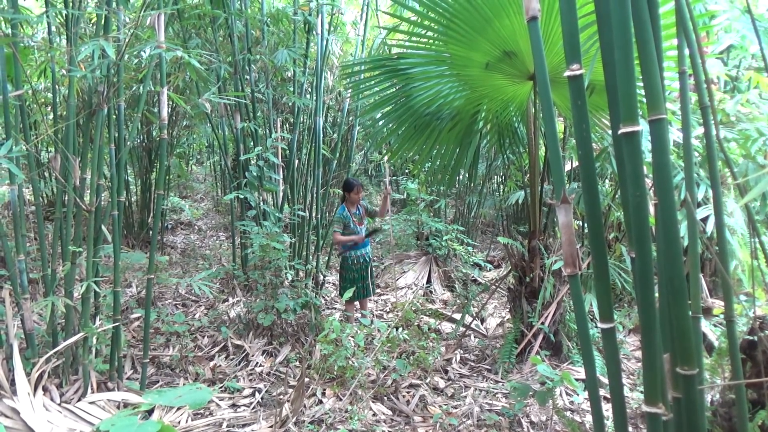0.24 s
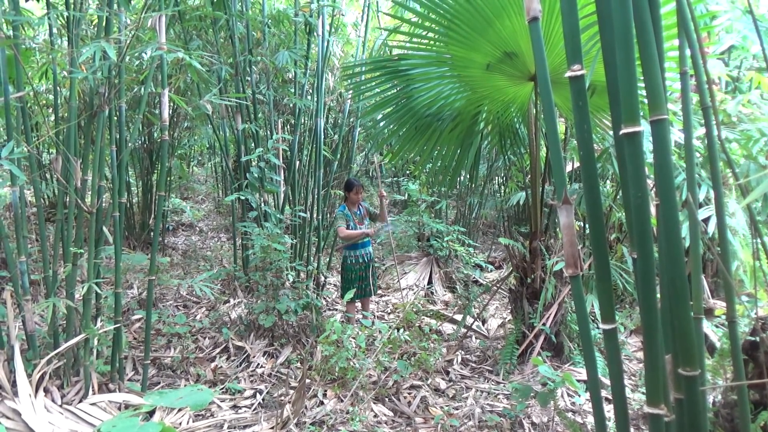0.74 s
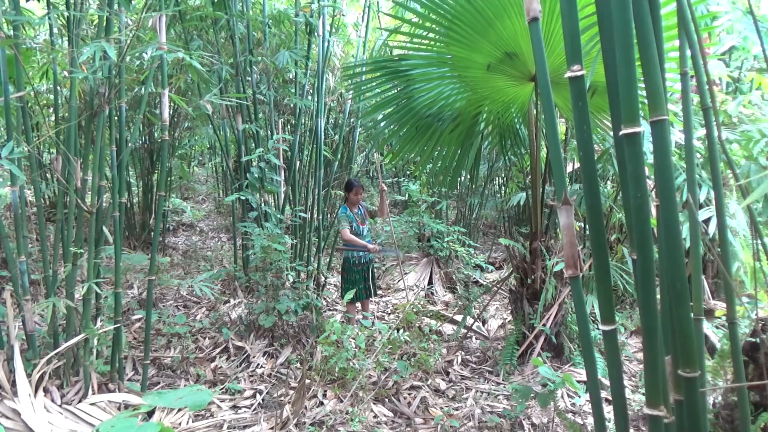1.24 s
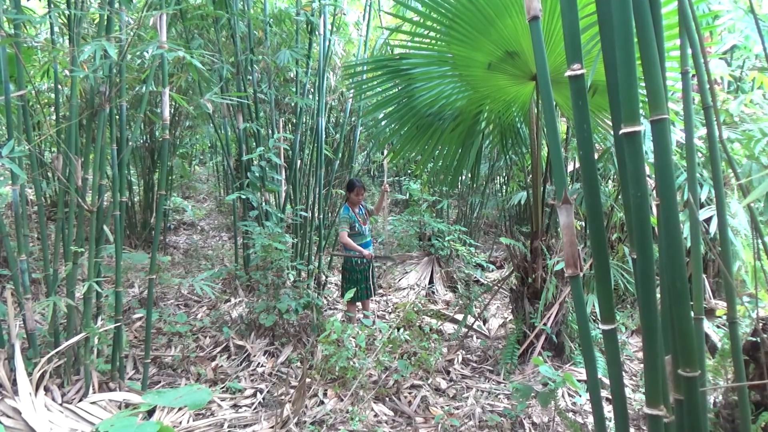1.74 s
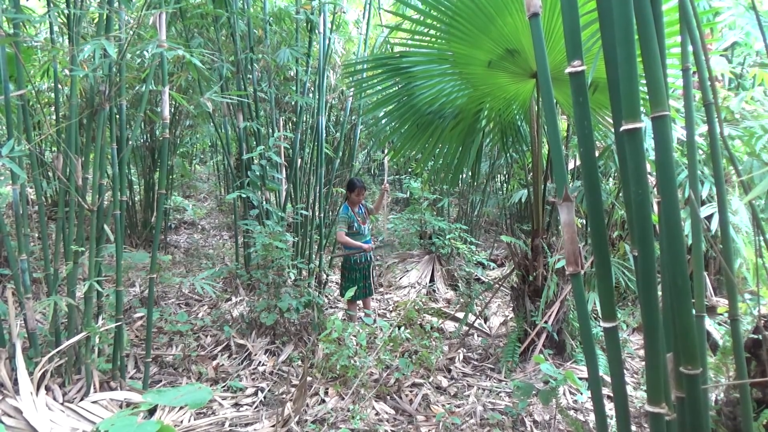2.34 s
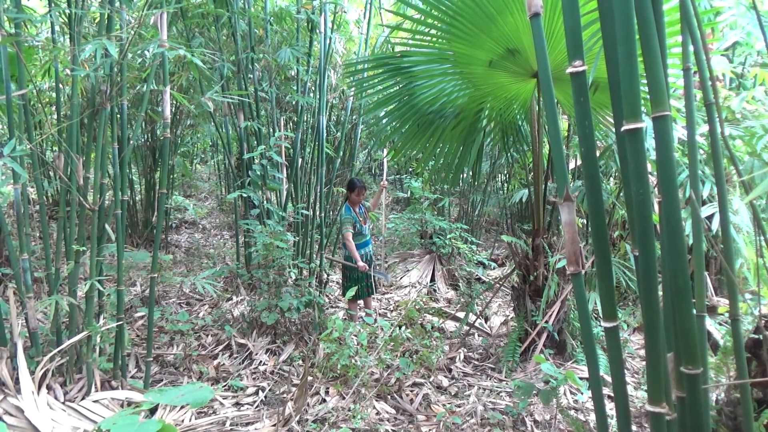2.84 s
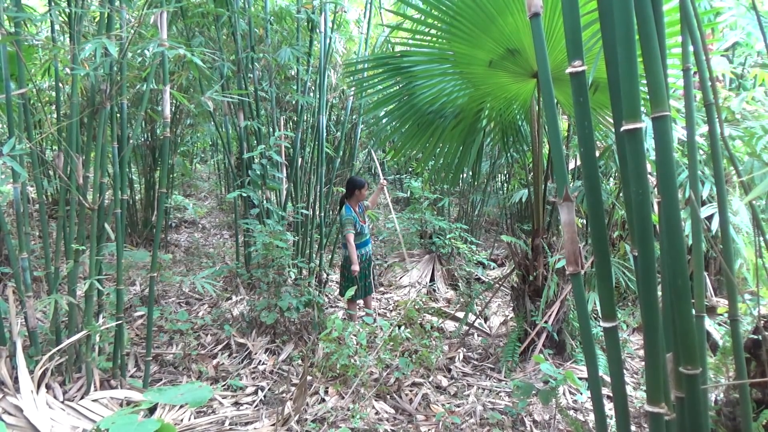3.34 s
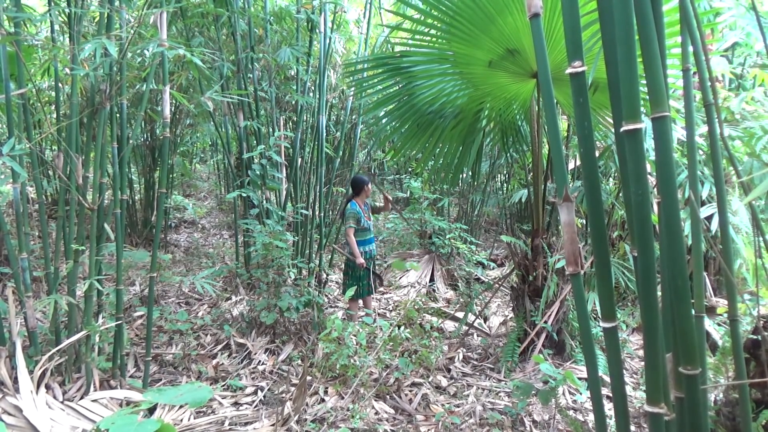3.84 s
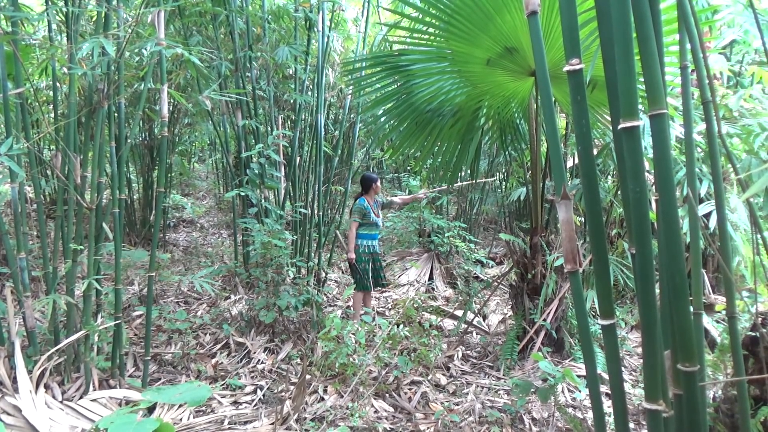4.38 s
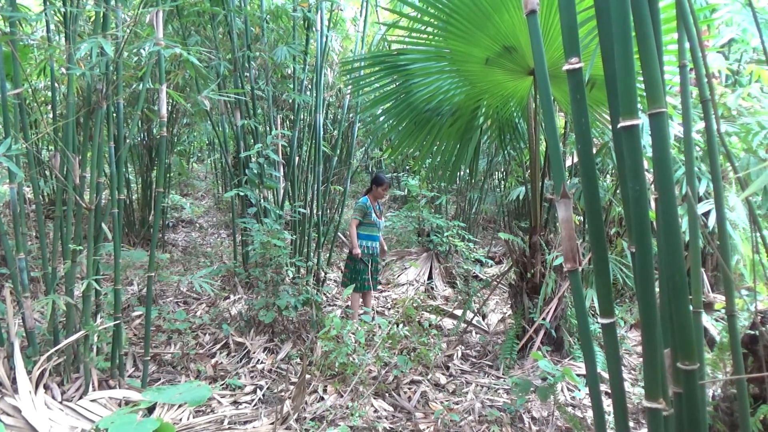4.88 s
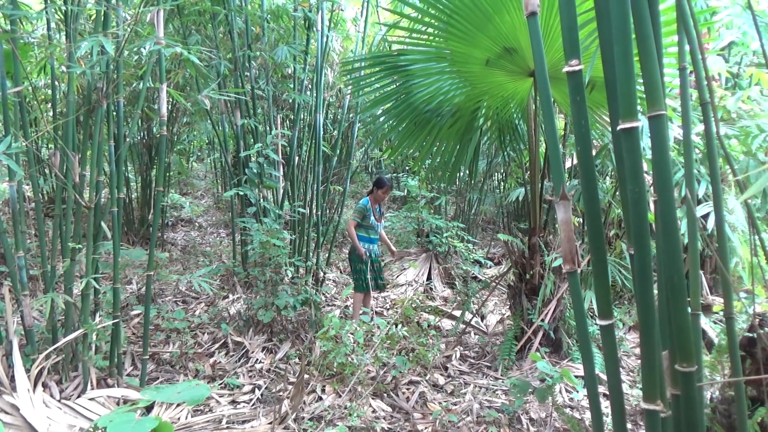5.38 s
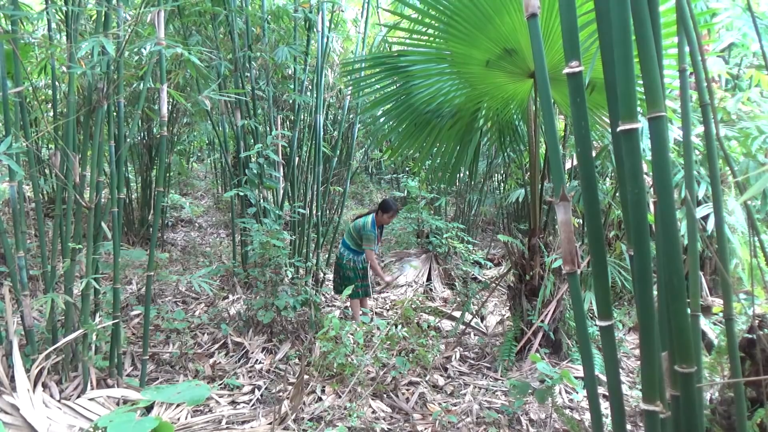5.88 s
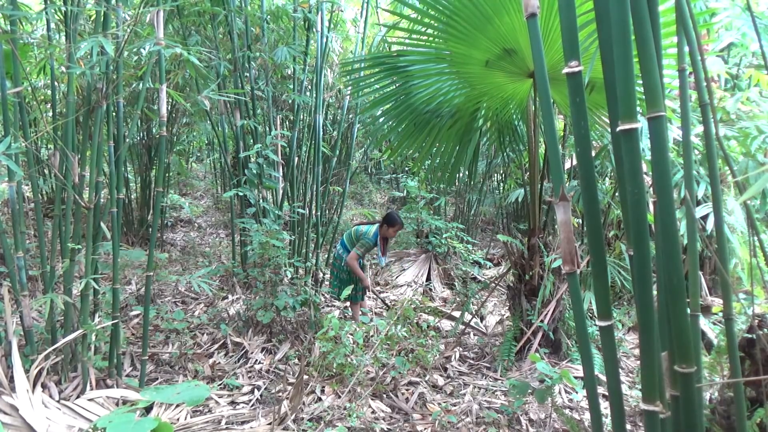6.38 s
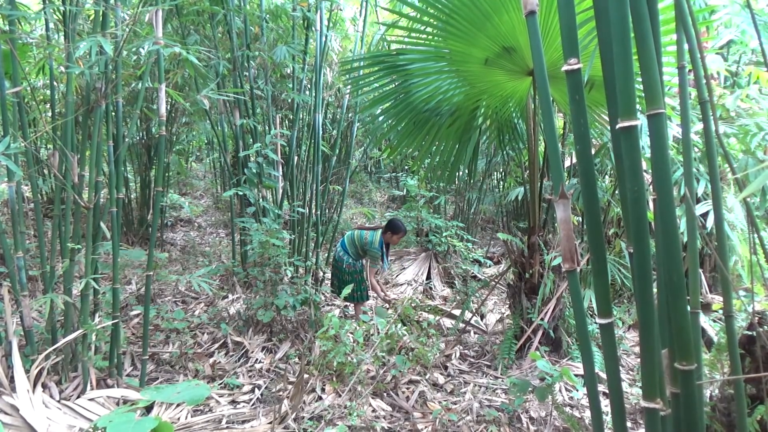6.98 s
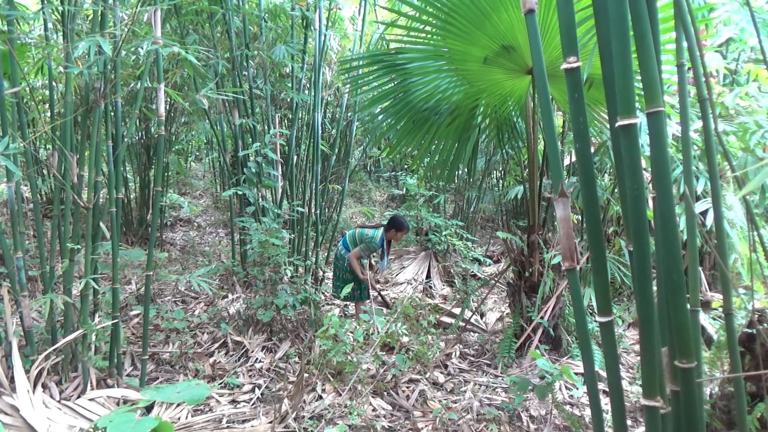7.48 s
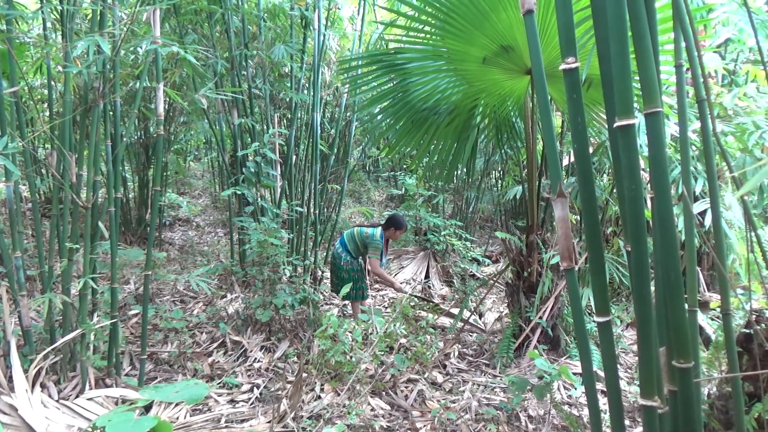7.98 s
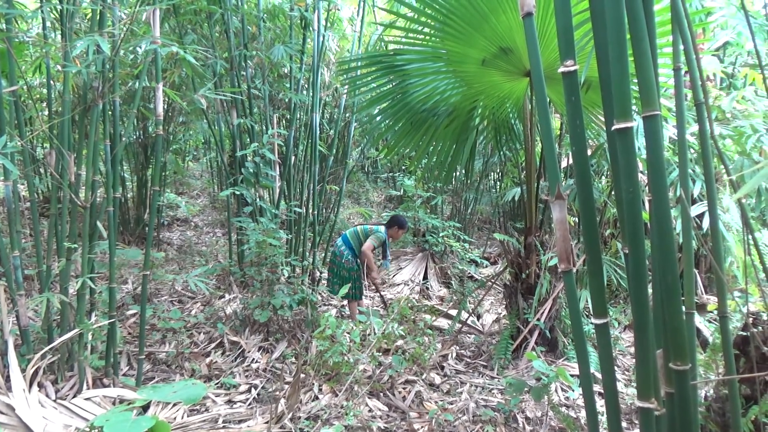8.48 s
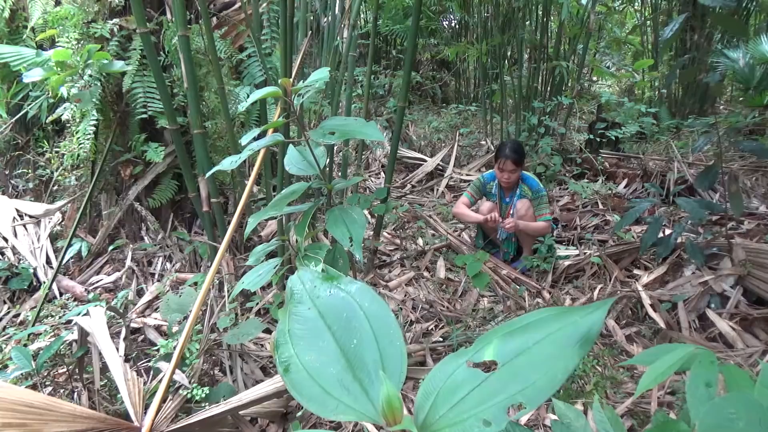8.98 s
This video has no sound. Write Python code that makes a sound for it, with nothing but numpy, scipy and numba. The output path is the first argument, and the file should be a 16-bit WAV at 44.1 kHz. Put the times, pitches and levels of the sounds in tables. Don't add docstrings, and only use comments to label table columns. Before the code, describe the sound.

Someone works among dry leaves and stems: light crackles and tiny jingles, a lull, then loud crunching bursts and hollow snaps in a quiet grove.

```python
import sys
import numpy as np
from scipy import signal
from scipy.fft import rfft, irfft, next_fast_len
from scipy.io import wavfile
from scipy.ndimage import uniform_filter1d
from numba import njit

SR = 44100
rng = np.random.default_rng(int(sys.argv[2]) if len(sys.argv) > 2 else 0)


def dump(signal):
    limited = np.clip(np.atleast_2d(signal).T, -1, 1)
    pcm = np.round(limited * 32767).astype(np.int16)
    wavfile.write(sys.argv[1], SR, pcm)


def makeup_ratio(level_db):
    decades = np.asarray(level_db, float) / 20
    return 10 ** decades


N = 406602
MUTE_FROM_S, MUTE_TO_S = 9.0412, 9.0585

# full from in seconds, hold in seconds, crisp leaves in
# dB, hollow stems minus leaves in dB, ground thud minus leaves in dB.
SLOW_PRESSES = [(.78, .07, -39, -14, -33), (1.25, .02, -39.5, -16, -18), (1.3, 0.018, -40, -9, -14),
                (1.36, 0.0033, -36, -8, -15), (1.56, 0.011, -49, -9, -13), (1.70, 0.015, -36, -13, -22),
                (1.97, .01, -44.5, -18, -9), (2.16, 0.076, -41, -11, -11.5), (2.29, .01, -40, -6, -28),
                (2.42, 0.24, -57.5, -7, -19), (2.65, 0.028, -43, -3.5, -20), (2.75, 0.041, -41, -8, -15),
                (3.05, 0.018, -51, -3, -4), (3.23, 0.014, -42.5, -25, -18), (3.33, 0.23, -51.5, -2, -18),
                (3.63, .02, -46.5, -3, -23), (3.75, .3, -64.5, 5, -5), (5.25, 0.033, -44, -8, -22),
                (5.55, 0.039, -51.5, 0, -6), (5.75, 0.093, -55, -12, -10), (5.9, 0.17, -60, -12, -7),
                (6.5, 0.024, -48, -2, -13), (6.75, 0.22, -49, -4.5, -23), (9.01, .03, -45, -28, -26)]
FOOT_PRESSES = [(5.155, 0.018, -26.5, -3.5, -20), (6.04, 0.016, -26.5, -1.5, -18),
                (6.07, 0.055, -21, -7.5, -18.5), (6.9, 0.035, -40.5, -16, -12.5),
                (6.97, 0.073, -36.5, -18, -31), (7.06, 0.13, -35.5, -9, -11.5), (7.18, .05, -30, -13, -17),
                (7.27, 0.1, -31.5, -11, -19), (7.39, 0.048, -28.5, -20, -9.5), (7.45, .03, -28.5, -18, -25),
                (7.5, 0.0089, -28.5, -17, -9.5), (7.565, 0.037, -31.5, -3.5, -13),
                (7.63, 0.035, -30, -5, -12), (7.72, 0.099, -48.5, -18, -12),
                (8.258, 0.028, -25.5, 1.7, -7.5), (8.29, 0.04, -23.5, -11, -32),
                (8.385, 0.016, -32.5, -16, -9.5), (8.44, 0.079, -34, -20, -18),
                (8.52, 0.076, -36, -5.5, -10)]
SETTLING_PRESSES = [
    (6.2, 0.031, -36, -5.5, -33),
    (8.63, .01, -42.5, -25, -22),
]
# start in seconds, peak in dB,
# crisp ring in Hz, hollow part minus peak in dB.
SHEATH_SNAPS = [(.6933, -30, 7260, -28), (.7257, -49, 10100, -25), (.7528, -29.5, 7490, -31),
                (.7623, -28, 4750, -32), (.7768, -19.5, 11500, -36), (.8292, -18.5, 9350, -45),
                (1.2298, -20.5, 9130, -24), (1.2389, -17.5, 9300, -24), (1.2491, -15, 8000, -34),
                (1.3394, -17.5, 11200, -22), (1.514, -34, 10900, -21), (1.6302, -27.5, 9510, -22),
                (1.6454, -31, 10400, -13), (1.6751, -34, 7920, -16), (1.7085, -32, 7930, -31),
                (1.916, -29.5, 7660, -11), (1.9699, -26.5, 10400, -35), (1.9984, -30, 9300, -12.5),
                (2.0313, -34.5, 7910, -6), (2.12, -26, 9370, -17), (2.146, -22.5, 9320, -18),
                (2.164, -24.5, 9350, -12), (2.1964, -25.5, 9050, -28), (2.284, -22.5, 7900, -25),
                (2.4026, -34, 9000, -19), (2.5986, -32, 9400, -27), (2.7087, -26.5, 9420, -28),
                (2.7342, -28, 7940, -16)]
TWIG_SNAPS = [(.1213, -37, 8840, -22), (3.2267, -28.5, 8860, -3.5), (3.3932, -36, 6980, -18),
              (3.479, -33, 8100, -12), (3.5316, -36, 6510, -15), (3.6095, -40.5, 3660, -18),
              (3.9058, -37, 5520, 2.3), (4.0986, -43, 5350, -17), (4.143, -42, 4150, -8),
              (5.7468, -37.5, 7530, -22), (5.7907, -37.5, 6600, -21), (1.5683, -35, 9500, -25),
              (5.8032, -37, 6610, -22), (6.1994, -30, 9660, -3), (6.6044, -38, 6340, -16),
              (6.7306, -42, 3640, -2.5), (6.9119, -20, 8000, -13), (6.9324, -17, 5500, -24),
              (7.5853, -22, 8950, -2), (8.8894, -40, 6270, -20), (6.583, -37.5, 5900, -21),
              (6.6797, -40.5, 5000, -18)]
FROND_SNAPS = [(5.1521, -27, 6430, -2), (6.035, -17.5, 8300, -18.5), (6.0624, -21, 11400, -19),
               (6.0752, -5.5, 8800, -23), (6.1064, -10, 10600, -23), (6.127, -6.5, 9600, -25),
               (8.2482, -19.5, 6470, 1), (8.3157, -21, 7790, -16), (8.3817, -2, 9500, -29),
               (8.4786, -23.5, 11560, -15), (8.506, -26, 6000, -3.5), (9.0006, -26.5, 9800, -41)]
STEM_SNAPS = [(7.008, -7, 5700, -54), (7.096, -28, 6900, -4), (7.134, -31, 7930, -2),
              (7.1647, -22, 9400, -7), (7.1826, -18.5, 8200, -11), (7.219, -20.5, 9150, -11),
              (7.268, -23.5, 4570, -7), (7.3083, -22, 6960, -10), (7.3309, -17.5, 7190, -5),
              (7.3533, -26, 7160, -4), (7.3864, -12.5, 7980, -7), (7.4008, -13, 6020, -1),
              (7.436, -9.5, 5320, -5), (7.448, -10, 4360, -16), (7.4905, -16, 5460, -11),
              (7.497, -10, 3500, -7), (7.5592, -21.5, 6870, -9), (7.6289, -15.5, 6300, -19),
              (7.6395, -34, 9650, -18), (7.6739, -19.5, 11800, -4), (7.798, -25, 10300, -40),
              (8.5235, -16.5, 6590, -12.5), (8.5715, -20.5, 6490, -20), (8.6025, -19.5, 9300, -22)]
# frequency in Hz, level in dB per Hz.
LEAF_COLOUR = [(260, -46), (450, -27), (946, -19), (1050, -17), (1180, -3), (2140, -1), (5800, -1),
               (9330, 1.5), (12900, -1.5), (15700, -13)]
# frequency in Hz, level in dB per Hz.
THUD_COLOUR = [(35, -60), (60, -16), (142, -4), (258, 1), (414, -6.5), (910, -7), (1000, -3.5), (1300, -29),
               (2200, -120)]
# start in seconds, first piece in dB, second piece minus first in dB,
# small pieces minus first in dB.
ORNAMENT_TOUCHES = [(.7861, -37, 2, -7), (.8405, -37, -3, -5), (1.056, -52.5, .4, -7),
                    (1.2384, -30.5, -1, -7), (1.2501, -27.5, -12, -12), (1.3448, -50, -11, -5),
                    (1.5948, -52.5, 7, 1.5), (1.6444, -50, 3, 1.5), (1.6761, -33, -5, -13),
                    (1.711, -36.5, -5, -10), (1.8976, -49, -7, -14), (1.9555, -43, -1.5, -2),
                    (1.9994, -48, 8, -14), (2.1201, -49, 2.5, -6), (2.1594, -44, 2, -3),
                    (2.2298, -41, -11, -17), (2.2837, -34.5, -10, -7.5), (2.4013, -51, 6.5, -8),
                    (2.4558, -51, -8, -9.5), (2.6549, -51, -5, -4), (2.7044, -45, 0, -8),
                    (2.7432, -37, -9.5, -14), (2.8035, -48, -2.5, -3), (3.023, -51, -13.5, -10),
                    (3.0609, -47, -17, -23)]
# piece number, frequency in Hz, level in dB, 60 dB decay in seconds.
ORNAMENT_MODES = [(0, 7895, -0.5, 0.12), (0, 7000, -20, 0.14), (0, 6490, -14, .12), (1, 9200, -3.5, 0.14),
                  (1, 9360, -4, 0.12), (2, 10480, 6.5, 0.081), (2, 11240, -11, .1), (3, 11760, -2, .12),
                  (3, 13200, -3, .12), (3, 14500, -15, .05), (1, 3616, -14.5, .12), (0, 4420, -17, .15)]
# start in seconds, end in seconds, first pitch in Hz,
# last pitch in Hz, level in dB.
FROND_WHISTLES = [
    (5.96, 6.035, 6500, 6950, -60),
    (7.817, 8.247, 2015, 2350, -67),
]
# frequency in Hz, level in dB per Hz.
GROVE_COLOUR = [(15, -51), (25, -10), (142, 1.5), (663, -11.5), (1020, -7), (1110, -11), (1420, -7.5),
                (1620, -13), (9420, -19), (14900, -22), (16200, -24)]
# time in seconds, firing rate in Hz, level in dB.
ENGINE_COURSE = [
    (0, 23.17, -69),
    (1.2, 22.99, -68),
    (2.2, 24.95, -70),
    (3.4, 28.97, -68),
    (5.15, 33.8, -68),
    (5.85, 23.83, -72.5),
    (7.9, 23.43, -69.5),
    (9.2, 25.4, -71),
]
# centre in Hz, width in Hz, level in dB.
DRONE_BANDS = [(1026, 57, -2), (1424, 80, -1.5), (1294, 52, -5.5), (869, 230, -4.5)]
# time in seconds, level in dB.
DRONE_COURSE = [
    (0, -68),
    (3, -57.5),
    (7.6, -58.5),
    (9.2, -66),
]
# frequency in Hz, level in dB.
STEREO_WIDTH = [(40, -25), (110, -20), (300, -12), (1300, -18), (2200, -16.5), (3800, -22), (5600, -14),
                (9000, -15), (13000, -18)]


def litter_pressure(t):
    def layers(leaf_db, stem_db, thud_db):
        return makeup_ratio(2 * np.array([[leaf_db], [leaf_db + stem_db], [leaf_db + thud_db]]))

    power = layers(-61.5, -3, 2) + 0 * t
    kinds = ((SLOW_PRESSES, 200, 400), (FOOT_PRESSES, 1960, 240), (SETTLING_PRESSES, 480, 55.6))
    for rows, rise, fall in kinds:
        for s, hold, *levels_db in rows:
            first = int(max(s - 60 / rise, 0) * SR)
            last = int((s + hold + 60 / fall) * SR)
            now = t[first:last]
            down_db = rise * np.maximum(s - now, 0) + fall * np.maximum(now - s - hold, 0)
            power[:, first:last] += layers(*levels_db) * makeup_ratio(-2 * down_db)
    return 10 * np.log10(power)


def crackle(leaf_db, stem_db, count=100000):
    at, pitch, size, sign = rng.random((count, 4)).T
    start = (at * N).astype(np.int64)
    hz = 450 * (16000 / 450) ** pitch
    stemmy = np.clip(np.log(5000 / hz) / np.log(5000 / 2200), 0, 1)
    table_hz, table_db = np.transpose(LEAF_COLOUR)
    tone_db = np.interp(np.log(hz), np.log(table_hz), table_db) + 20 * np.log10(hz / 8000)
    octaves_up = np.maximum(np.log2(hz / 8000), 0)
    tone_db = tone_db - 0.4 * octaves_up * np.maximum(stem_db[start] + 9.0, 0)
    size_db = np.minimum(-3.0 * np.log(size), 14)
    flurry_db = 1.47 * walk(45)[start]
    db = leaf_db[start] + stemmy * (stem_db[start] + 3.0) + tone_db + size_db + flurry_db
    grains = rings(start, hz, 18.7 / hz, makeup_ratio(db - 5.5) * np.sign(sign - .5))
    return filtered(grains, 350, "high")


def snaps(rows, hollow_ring_hz, ring_s, knock_db, size=4096):
    out = np.zeros(N + size)
    t = np.arange(size) / SR
    hz = np.fft.rfftfreq(size, 1 / SR) + 1
    thin = shape(LEAF_COLOUR, size) * np.minimum(hz / 3500, 1) ** 0.73
    knock = makeup_ratio(knock_db + 8.5) * np.exp(-(np.log2(hz / 252) / 0.41) ** 2)
    for s, peak_db, crisp_hz, hollow_db in rows:
        noise = rng.standard_normal(size)
        hollow_hz = hollow_ring_hz * np.exp(.06 * noise[0])
        t60 = ring_s * np.exp(.1 * noise[1])
        off = np.log(hz / crisp_hz)
        crisp = thin * (0.63 + np.exp(-(off / 0.58) ** 2) + 1.17 * np.exp(-(off / 0.045) ** 2))
        hollow = 1 / (1 + (np.log(hz / hollow_hz) / 0.2) ** 2) ** 0.76 + knock
        crisp_part = irfft(rfft(noise) * crisp)
        hollow_part = irfft(rfft(noise) * hollow)
        body = crisp_part / np.std(crisp_part)
        body = body + makeup_ratio(hollow_db + 4.5) * hollow_part / np.std(hollow_part)
        tail_s = np.clip(t60, .02, .15)
        crack = (0.064 / tail_s) ** 0.95 * np.exp(-t / 0.0012)
        fade = crack + 0.62 * makeup_ratio(-60 * t / tail_s)
        attack = np.minimum(t / (0.021 * tail_s), 1)
        at = int(s * SR)
        out[at:at + size] += makeup_ratio(peak_db - 9.0) * body * fade * attack
    return out[:N]


def thud(db):
    lumps = rng.standard_normal(N) * makeup_ratio(2.0 * walk(30))
    return colour(lumps, THUD_COLOUR, -7.5) * makeup_ratio(db)


def jingle(count=3):
    s, first_db, second_db, small_db = np.array(ORNAMENT_TOUCHES).T
    piece, hz, mode_db, t60 = np.transpose(ORNAMENT_MODES)
    lean_db = (5.0 - 4.5 * (s - 1)) / 2
    piece_db = np.c_[0 * s, second_db, small_db - lean_db, small_db + lean_db]
    hit_db = first_db[:, None] + 0.94 * piece_db[:, piece.astype(int)] + mode_db - 3.0
    out = 0
    for k in range(count):
        late, detune, force, damping = rng.standard_normal((4, len(s), len(hz)))
        start = ((s[:, None] + (.0015 + 0.0081 * k) * abs(late)) * SR).astype(np.int64)
        ring_hz = hz * (1 + 0.0031 * detune)
        ring_s = t60 * makeup_ratio(2.0 * damping)
        gain = makeup_ratio(hit_db - 5.8 * k + 3.4 * force)
        out = out + rings(start.ravel(), ring_hz.ravel(), ring_s.ravel(), gain.ravel())
    return out


def swish(t):
    t0, t1, hz0, hz1, db = np.transpose(FROND_WHISTLES)
    hz = np.interp(t, np.c_[t0, t1].ravel(), np.c_[hz0, hz1].ravel())
    swell = 0
    for a, b, gain in zip(t0, t1, makeup_ratio(db)):
        swell = swell + gain * np.sin(np.pi * np.clip((t - a) / (b - a), 0, 1))
    return narrow(hz, width_hz=350.0) * swell


def trunks(x, t60, db):
    t = np.arange(int(.35 * SR)) / SR
    cloud = rng.standard_normal(len(t)) * makeup_ratio(-60 * t / t60) * np.minimum(t / 0.00043, 1)
    return signal.fftconvolve(x, cloud * makeup_ratio(db) / np.sqrt(np.sum(cloud ** 2)))[:N]


def grove(t):
    air = colour(rng.standard_normal(N), GROVE_COLOUR, -57)
    rumble = filtered(air, 400, "low")
    hiss = air - rumble
    return (rumble + engine(t)) * makeup_ratio(0.6 * walk(1.97)) + hiss * makeup_ratio(1.0 * walk(4)) + drone(t)


def engine(t):
    s, hz, db = np.transpose(ENGINE_COURSE)
    hz = np.interp(t, s, hz) * (1 + .003 * walk(5))
    phase = 2 * np.pi * np.cumsum(hz) / SR
    orders = 0
    for k in range(2, 9):
        exhaust_db = -11.5 * np.log2(k * hz / 130) ** 2
        orders = orders + makeup_ratio(2.2 * walk(3.5) + exhaust_db) * np.sin(k * phase + k * k)
    return makeup_ratio(np.interp(t, s, db)) * orders


def drone(t):
    bands = sum(makeup_ratio(db + 1.9 * walk(1.83)) * narrow(hz, width) for hz, width, db in DRONE_BANDS)
    return bands * makeup_ratio(np.interp(t, *np.transpose(DRONE_COURSE)) - 10.0)


def shape(points, size):
    hz, db = np.transpose(points)
    return makeup_ratio(np.interp(np.log(np.fft.rfftfreq(size, 1 / SR) + 1), np.log(hz), db))


def shaped(x, points):
    size = next_fast_len(len(x))
    return irfft(rfft(x, size) * shape(points, size), size)[:len(x)]


def colour(x, points, db):
    y = shaped(x, points)
    return y * makeup_ratio(db) / np.std(y)


def filtered(x, hz, kind):
    return signal.sosfilt(signal.butter(2, hz, kind, fs=SR, output="sos"), x)


def walk(rate):
    k = int(SR / rate)
    held = np.repeat(rng.standard_normal(N // k + 1), k)
    return 1.6 * uniform_filter1d(uniform_filter1d(held, k), k)[:N]


def narrow(hz, width_hz):
    k = int(SR / width_hz)
    slow = uniform_filter1d(uniform_filter1d(rng.standard_normal((2, N)), k), k)
    carrier = np.exp(2j * np.pi * np.cumsum(hz + np.zeros(N)) / SR)
    y = ((slow[0] + 1j * slow[1]) * carrier).real
    return y / np.std(y)


@njit
def rings(start, hz, t60, gain):
    out = np.zeros(N)
    for k in range(len(start)):
        turn = np.exp(2j * np.pi * hz[k] / SR - np.log(1000) / (t60[k] * SR))
        z = gain[k] + 0j
        for i in range(start[k], min(N, start[k] + int(t60[k] * SR))):
            out[i] += z.imag
            z *= turn
    return out


def scene():
    t = np.arange(N) / SR
    leaf_db, stem_db, thud_db = litter_pressure(t)
    broken = snaps(SHEATH_SNAPS, hollow_ring_hz=2050, ring_s=0.068, knock_db=-32)
    broken = broken + snaps(TWIG_SNAPS, hollow_ring_hz=2020, ring_s=0.062, knock_db=-17.5)
    broken = broken + snaps(FROND_SNAPS, hollow_ring_hz=2100, ring_s=0.08, knock_db=-14)
    broken = broken + snaps(STEM_SNAPS, hollow_ring_hz=2190, ring_s=0.049, knock_db=-10)
    near = crackle(leaf_db, stem_db - leaf_db) + filtered(broken, 130, "high")
    near = near + thud(thud_db) + jingle() + swish(t)
    near = near + trunks(near, t60=0.34, db=-8.5)
    near = near * (t < MUTE_FROM_S)
    far = grove(t)
    mid = near + far
    stray = 0.079 * mid + np.roll(far, SR // 20) + trunks(near, t60=0.061, db=-9.5)
    side = shaped(stray, STEREO_WIDTH)
    return mid + side * np.array([[1], [-1]])


def low_pass(x):
    return signal.sosfilt(signal.butter(12, 16640, fs=SR, output="sos"), x)


def record(dry):
    t = np.arange(N) / SR
    cut = signal.sosfilt(signal.ellip(8, .2, 60, 15900, fs=SR, output="sos"), dry)
    cut = filtered(cut, 36, "high")
    mute = np.where((t > MUTE_FROM_S) & (t < MUTE_TO_S), makeup_ratio(-45), 1)
    return low_pass(cut * mute)


dry = scene()
out = record(dry)
dump(out)
```